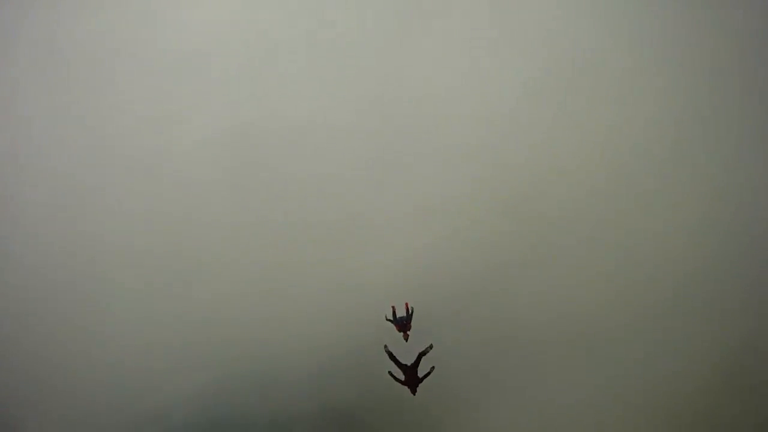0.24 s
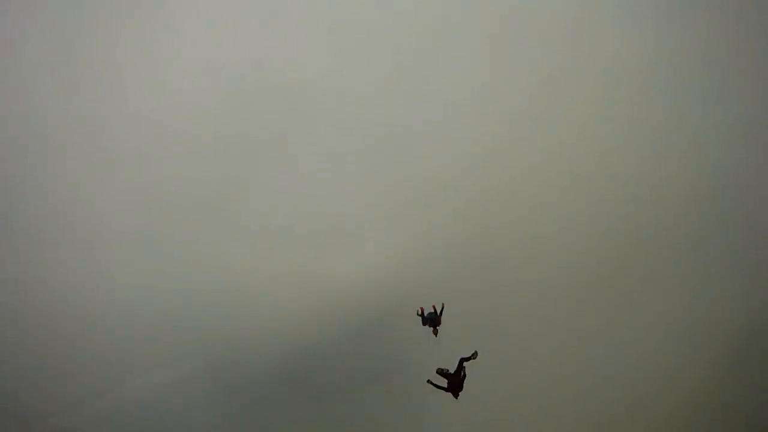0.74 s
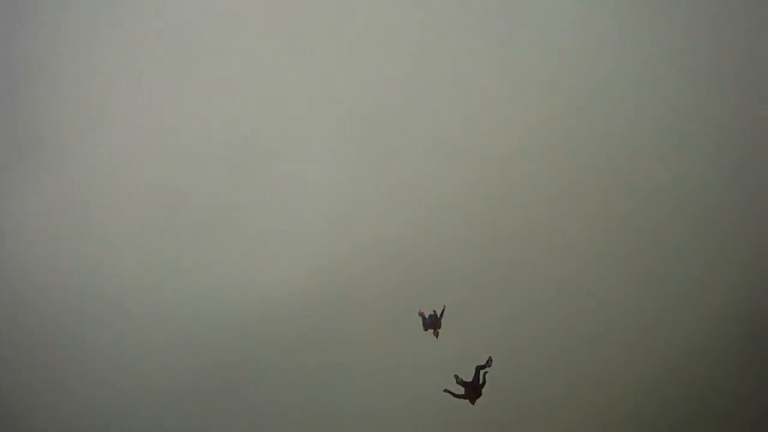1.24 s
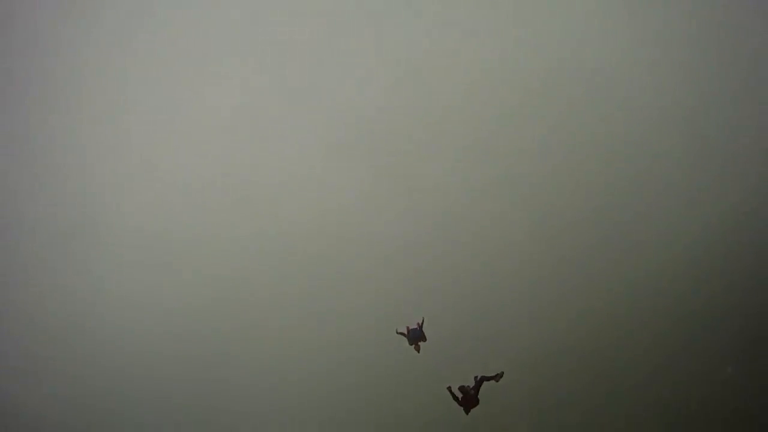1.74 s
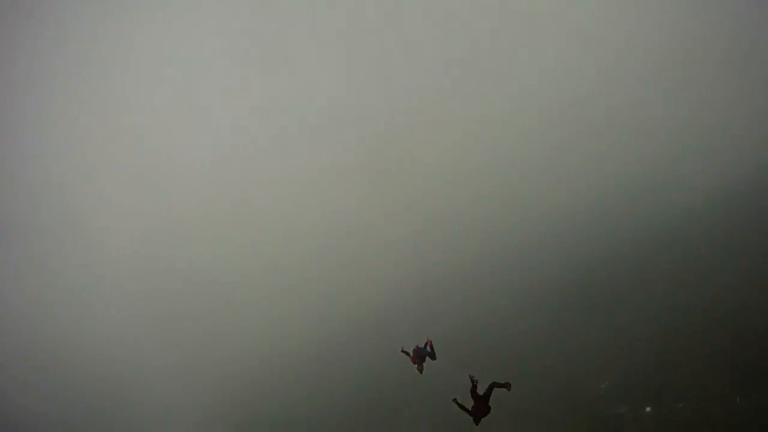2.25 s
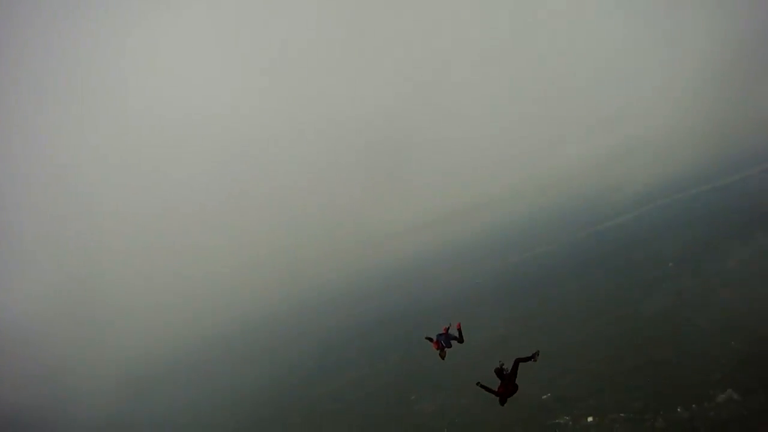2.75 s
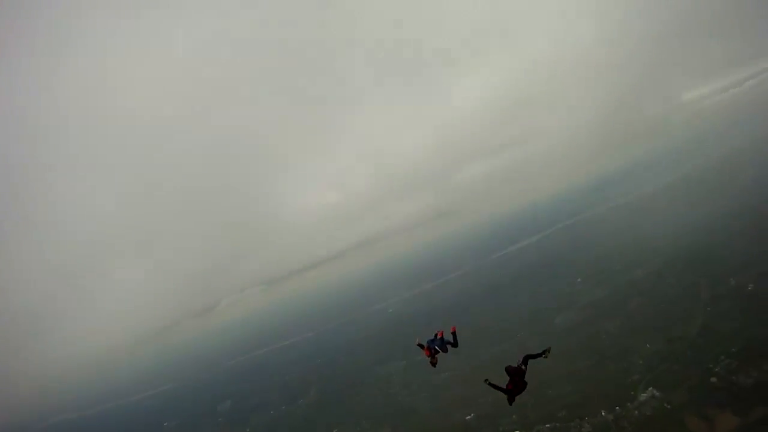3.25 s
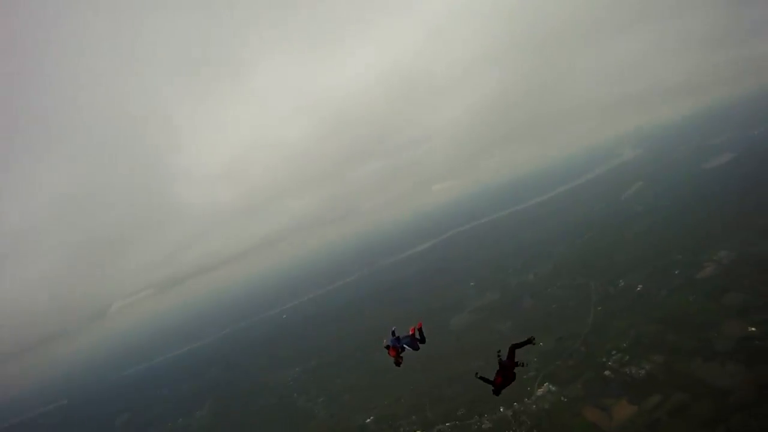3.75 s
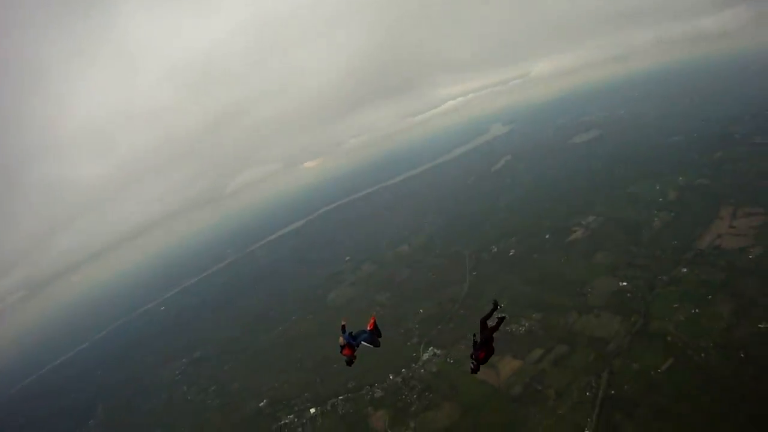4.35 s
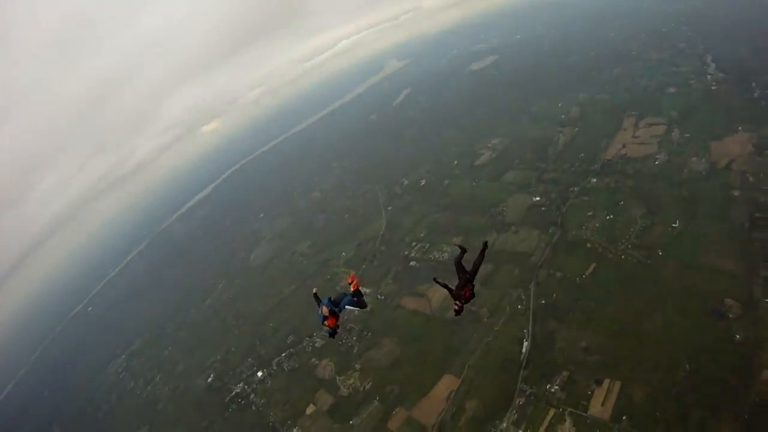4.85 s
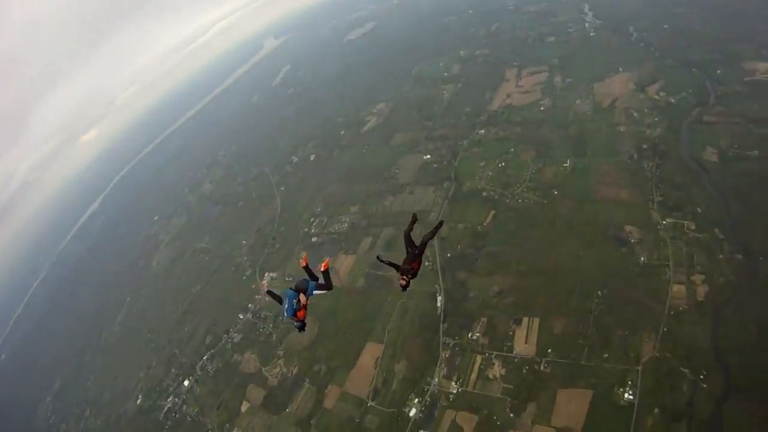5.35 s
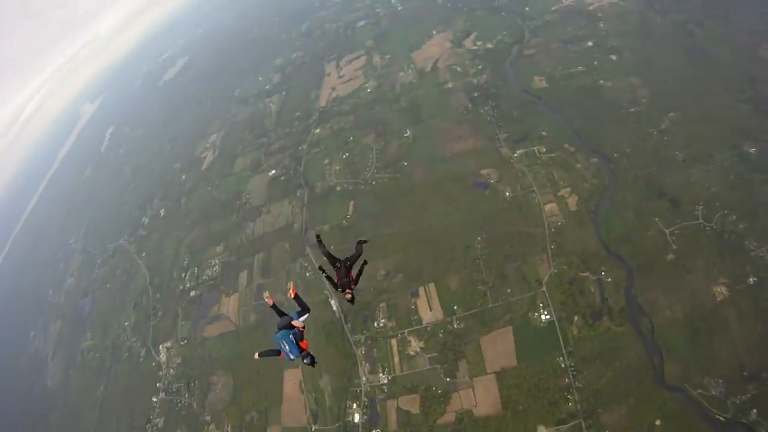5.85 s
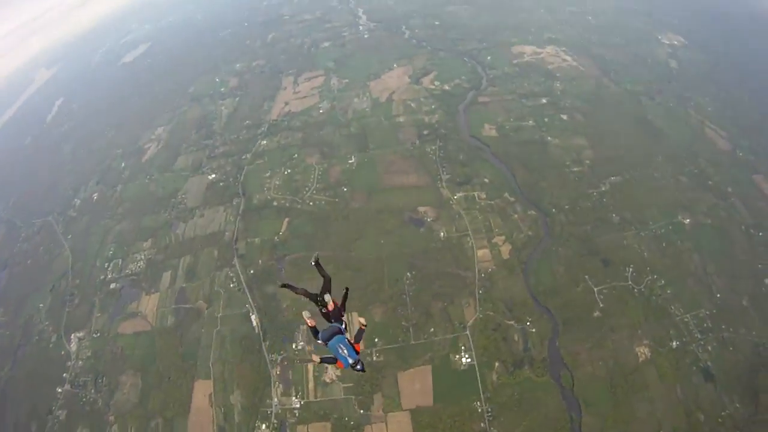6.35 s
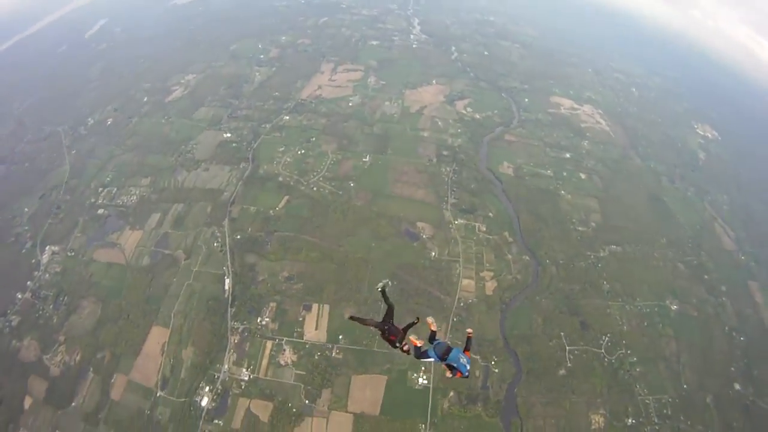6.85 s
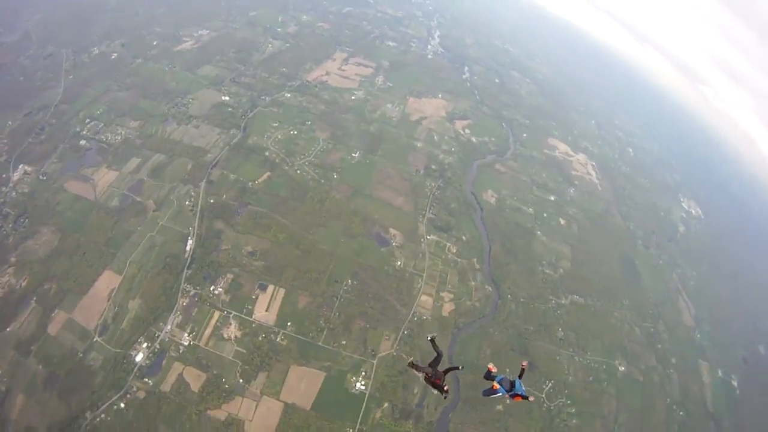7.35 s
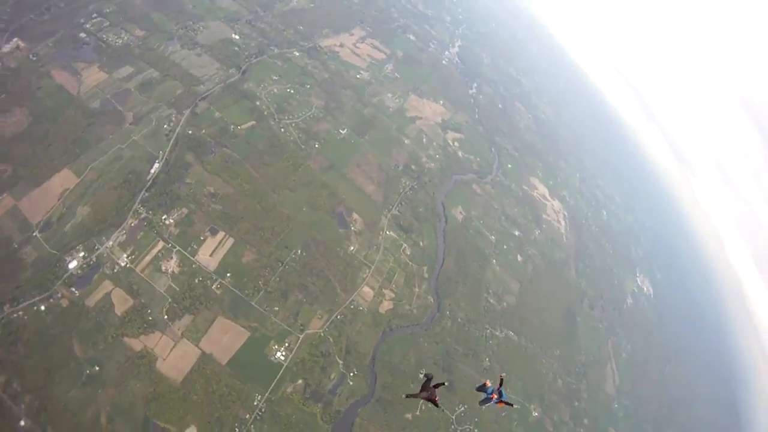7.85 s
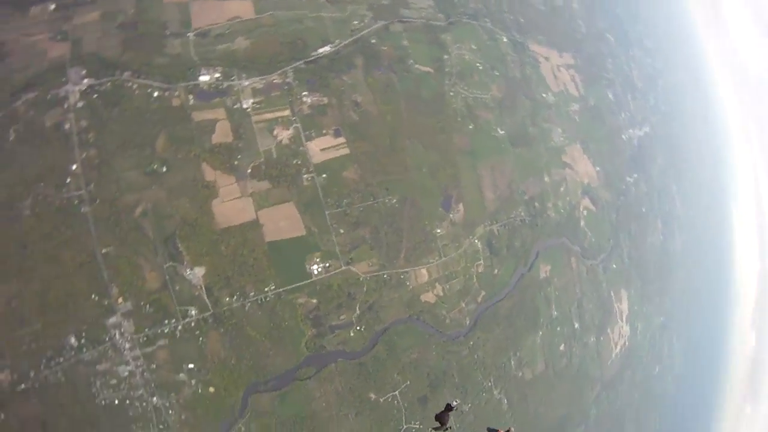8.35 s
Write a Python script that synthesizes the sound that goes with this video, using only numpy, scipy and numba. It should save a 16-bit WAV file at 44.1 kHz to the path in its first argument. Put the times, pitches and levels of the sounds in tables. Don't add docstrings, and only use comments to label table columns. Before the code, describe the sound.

A steady, loud freefall wind roar runs from start to finish, close on a helmet camera microphone in open sky. From 0 to 4 seconds it is hollow and midrange, ringing around two kilohertz, with faint low strap hums beneath, strongest near 0.3, 2.4 and 3.3-4. A flap dips in pitch around 1.2-1.8, and sharp little surges jolt at 1.7-1.8 and 3.5-3.7. Between 4 and 4.5 the head turns into the wind: the hiss broadens and deep buffeting swells, thumping at 4.4 and 5.25. A tiny high squeak flicks by at 4.75. Rough, breathy whistles blend in faintly from 6.7 to 8.4, with a hard surge near 7.6. Piercing short chirps cluster at 8.4-8.6 as the hiss brightens and another surge hits. The sound is compressed, gritty and metallic in the treble.

```python
import sys
import numpy as np
from scipy import signal
from scipy.fft import rfft, irfft
from scipy.io import wavfile
from scipy.ndimage import uniform_filter1d, map_coordinates
from numba import njit

SR = 44100
rng = np.random.default_rng(int(sys.argv[2]) if len(sys.argv) > 2 else 0)


def materialize(psi):
    bounded = np.clip(np.atleast_2d(psi).T, -1, 1)
    quanta = np.round(bounded * 32767).astype(np.int16)
    wavfile.write(sys.argv[1], SR, quanta)


def elevation(decibels):
    levels = np.asarray(decibels, float)
    return 10 ** (levels / 20)


N = 379260
SLOW_HZ, FAST_HZ = 12000, 48000

# [t/s, share/0-1]
HEAD_TURN = [
    (0, 0.03),
    (3.6, 0.06),
    (3.95, 0.2),
    (4.2, 0.79),
    (4.55, 1),
    (8.6, 0.85),
]
# [t/s, level/dB]
PRESSURE = [(0.0, -14.5), (1.75, -14.5), (1.87, -15.5), (3.02, -13.5), (3.66, -16.5), (3.97, -15),
            (4.0, -11), (4.02, -19), (4.33, -13.5), (5.2, -14.5), (6.06, -13), (6.63, -16), (6.75, -14.5),
            (8.21, -14), (8.31, -13), (8.38, -16.5), (8.46, -13.5), (8.6, -17.5)]
# [t/s, level/dB]
WAKE = [(0.0, -29.5), (1.63, -32), (1.84, -35), (2.3, -30), (2.94, -28.5), (3.02, -32.5), (3.04, -32.5),
        (3.62, -33.5), (4.33, -27), (4.69, -33.5), (5.15, -35), (5.82, -28.5), (7.11, -34.5), (7.35, -29),
        (7.64, -33.5), (8.29, -30.5), (8.46, -34), (8.6, -44)]
# [f/Hz, width/Hz, level/dB, f/Hz, width/Hz, level/dB]
ROAR_MODES = [(920, 167, -11.5, 874, 57, -7.5), (1084, 142, -3.5, 1117, 157, -8),
              (1458, 315, -4, 1500, 504, -3), (1830, 250, -7, 1050, 230, -6),
              (1908, 236, 1, 2003, 370, 0.5), (2202, 307, 0.5, 2262, 310, -1.5),
              (2602, 160, -12.5, 2560, 280, -4.5)]
# [f/Hz, width/Hz, level/dB, f/Hz, width/Hz, level/dB]
HISS_MODES = [(3150, 220, -5, 2890, 750, -7.5), (3536, 340, 0, 3300, 530, -3),
              (4010, 370, -16, 3755, 1000, -2.5), (4440, 660, -18, 3880, 300, -14.5),
              (4820, 490, -18, 4420, 370, -7), (5080, 610, -20.5, 4980, 580, -10),
              (5640, 830, -20.5, 5685, 1700, -10)]
# [f/Hz, width/Hz, level/dB, f/Hz, width/Hz, level/dB]
BODY_MODES = [(185, 180, -7.5, 183, 290, -2), (307, 160, 0, 230, 330, -1.5), (418, 58, -4, 410, 210, -2),
              (526, 86, 2, 545, 250, -3), (627, 54, 4.5, 625, 150, -5.5), (710, 230, -1.5, 730, 350, -4.5)]
# [f/Hz, width/Hz, level/dB, f/Hz, width/Hz, level/dB]
BUFFET_MODES = [(45, 50, -18, 58, 33, 4), (95, 39, -1.5, 109, 51, 12), (127, 74, -7.5, 114, 35, -4.5)]
# [t/s, half length/s, level/dB]
NODS = [
    (.25, .2, -3.5),
    (1.55, .2, 1.5),
    (3.75, .15, 3.5),
    (4.5, .2, 3),
    (5.0, .08, 2),
    (5.75, .25, 2),
    (6.3, 0.13, 2.5),
    (7.05, 0.083, -2),
    (7.55, .25, 3),
]
# [t/s, half length/s, level/dB]
DRAUGHTS = [(1.7, 0.063, 2), (2.0, 0.16, -1), (2.9, .15, 0), (3.5, .3, 2.1), (4.25, 0.33, -3.5),
            (4.72, 0.061, 0.5), (5.3, 0.085, 2.5), (5.65, 0.24, 2.5), (6.3, 0.17, 2), (6.72, 0.12, 3.5),
            (7.45, .1, 2.5), (8.58, 0.18, 7.5)]
# [t/s, half length/s, level/dB]
THUMPS = [(1.2, .08, 2), (1.35, .08, -4), (1.6, .15, 0), (1.85, .05, -5), (2.0, .1, 1.5), (4.1, 0.17, -1),
          (4.42, .18, 8.5), (4.73, .07, -7), (5.05, .1, -1), (5.25, 0.068, 7), (5.7, .12, 2),
          (6.1, 0.12, 4), (6.7, 0.22, 2.5), (6.97, 0.097, -4), (7.4, .2, 1.5), (7.9, 0.17, 0),
          (8.45, .12, 3)]
# [start t/s, length/s, settled f/Hz, level/dB]
STRAP_HUMS = [
    (0.0, .3, 90, -41),
    (0.221, 0.57, 86.3, -34),
    (0.752, .5, 84, -41),
    (1.401, 0.22, 108, -42),
    (2.329, 0.5, 84, -33.5),
    (3.238, 0.87, 83.5, -32.5),
]
# [start t/s, length/s, taut f/Hz, slack f/Hz, level/dB]
STRAP_FLAPS = [
    (1.17, .7, 330, 242, -37.5),
    (2.9, 0.86, 322, 315, -42.5),
    (3.845, .22, 317, 280, -35),
]
# [t/s, f/Hz, level/dB]
SQUEAK_PATH = [
    (4.69, 5120, -35),
    (4.715, 5080, -30),
    (4.735, 5010, -26),
    (4.762, 5070, -28),
    (4.775, 5200, -29),
    (4.81, 5270, -31),
    (4.83, 5280, -38),
]
# [start t/s, length/s, level/dB]
SLOT_WHISTLES = [
    (6.72, .3, -30),
    (7.05, .7, -34.5),
    (7.85, .55, -31),
]
# [start t/s, length/s, level/dB]
PIPE_WHISTLES = [
    (8.372, 0.032, -17),
    (8.416, .04, -26),
    (8.468, .055, -24),
    (8.512, 0.051, -12),
    (8.545, .1, -15),
]
# [peak t/s, surge level/dB, drop afterwards/dB]
SURGES = [
    (1.737, 10, -1),
    (1.81, 9, 1.5),
    (3.2, -6, 3),
    (3.519, 8.5, 2.5),
    (3.655, 6, 0.5),
    (4.0, -5, 1.5),
    (4.048, 4, 1),
    (5.08, -8, 3),
    (7.575, 13, -2.5),
    (8.538, 13, -0.5),
]


def unit(x):
    return x / np.sqrt(np.mean(x ** 2) + 1e-20)


def curves(rows, t):
    s, *columns = np.transpose(rows)
    return [np.interp(t, s, column) for column in columns]


def head_turn(t):
    return np.clip(curves(HEAD_TURN, t)[0], 0, 1)


def wobble(rate, t):
    return map_coordinates(rng.standard_normal(round(rate * N / SR) + 4), [t * rate + 1])


def bumps(rows, t):
    return sum(db * np.exp(-((t - s) / half) ** 2) for s, half, db in rows)


def ironed(x, share):
    power = uniform_filter1d(x ** 2, size=SR // 25)
    return unit(x / (power + .05) ** (share / 2))


def cavities(modes, drift_db, size, tilt_db=None, nods=()):
    nod_hz, nod_octaves = 1470, 0.23
    hz, t, z = signal.stft(rng.standard_normal(N), SR, nperseg=size)
    z[hz > SLOW_HZ / 2] = 0
    hz = hz[hz <= SLOW_HZ / 2, None]
    turn = head_turn(t)
    tilt = 0 if tilt_db is None else np.interp(t, np.arange(N) / SR, tilt_db)
    power = 0
    for sheltered, facing in np.reshape(modes, (-1, 2, 3)):
        centre, width, db = sheltered[:, None] * (1 - turn) + facing[:, None] * turn
        nod_db = bumps(nods, t) * np.exp(-(np.log2(centre / nod_hz) / nod_octaves) ** 2)
        own_db = drift_db * (wobble(2.62, t) + 0.84 * wobble(9, t))
        feed = elevation(db + nod_db + tilt * np.log2(centre) + own_db)
        power = power + (feed / (1 + (2 * (hz - centre) / width) ** 2)) ** 2
    z[:len(hz)] *= np.sqrt(power / power.mean(axis=0))
    return unit(signal.istft(z, SR, nperseg=size)[1][:N])


def wind():
    t = np.arange(N) / SR
    pressure, wake = (c - c.mean() for c in curves(PRESSURE, t) + curves(WAKE, t))
    turn = head_turn(t)

    def level(base_db, per_pressure, per_wake, turn_db):
        return base_db + per_pressure * pressure + per_wake * wake + turn_db * turn

    roar_tilt = -0.48 * wake + 0.7 * pressure
    body_tilt = -0.13 * wake + .3 * pressure
    swell_db = 0.45 * wobble(9, t)
    eddies_db = .5 * wobble(12, t) + 1.04 * wobble(45, t) + 0.29 * wobble(130, t)
    roar_db = 0.84 * eddies_db + swell_db
    hiss_db = 0.16 * eddies_db + 0.9 * swell_db + 0.4 * wobble(20, t)
    body_db = 0.52 * eddies_db + 1.03 * wobble(9, t)

    roar = unit(elevation(roar_db) * cavities(ROAR_MODES, drift_db=0.4, size=2048, tilt_db=roar_tilt, nods=NODS))
    hiss = unit(elevation(hiss_db) * cavities(HISS_MODES, drift_db=-0.5, size=2048))
    body = unit(elevation(body_db) * cavities(BODY_MODES, drift_db=-0.14, size=2048, tilt_db=body_tilt))
    buffet = ironed(cavities(BUFFET_MODES, drift_db=-0.2, size=4096), share=.5)

    sound = elevation(level(-14, 1.15, 0, -0.62)) * roar
    sound += elevation(level(-28.5, 0.86, 0.11, 8) + bumps(DRAUGHTS, t)) * hiss
    sound += elevation(level(-31.5, 0.24, 1.06, 1.25)) * body
    sound += elevation(level(-39, -0.5, 0.27, 9) + bumps(THUMPS, t)) * buffet
    return sound


def tone(rows, unsteady, rate, shake_db, fade):
    start, end = rows[0][0], rows[-1][0]
    t = np.arange(round(start * SR), min(N, round(end * SR))) / SR
    hz, db = curves(rows, t)
    gate = np.clip(np.minimum(t - t[0], end - t) / fade, 0, 1)
    phase = 2 * np.pi * np.cumsum(hz * (1 + unsteady * wobble(rate, t))) / SR
    strength = np.sqrt(2) * gate * elevation(db + shake_db * wobble(rate, t))
    return np.pad(strength * np.sin(phase), (max(0, round(t[0] * SR)), N))[:N]


def strap_hum():
    catch, settle_s, fades_db = 1.067, 0.14, 3
    sound = 0
    for s, length, hz, db in STRAP_HUMS:
        rows = [(s, catch * hz, db), (s + settle_s, hz, db), (s + length, hz * .97, db - fades_db)]
        sound = sound + tone(rows, unsteady=0.014, rate=9.0, shake_db=0.5, fade=.06)
    return sound


def strap_flap():
    sound = 0
    for s, length, taut, slack, db in STRAP_FLAPS:
        rows = [(s, taut, db), (s + length / 2, slack, db), (s + length, taut, db - 5)]
        sound = sound + tone(rows, unsteady=0.011, rate=24, shake_db=2.0, fade=0.04)
    return sound


def squeak():
    return elevation(1.5) * tone(SQUEAK_PATH, unsteady=0.011, rate=300, shake_db=4.0, fade=.012)


def swell(s, length, db, hz):
    peak_at, swell_db = .35, 6.5
    return [(s, hz, db - swell_db), (s + peak_at * length, hz, db), (s + length, hz, db - swell_db)]


def slot_whistle():
    return sum(tone(swell(*row, 878), unsteady=0.0692, rate=83, shake_db=4.0, fade=0.05)
               for row in SLOT_WHISTLES)


def pipe_whistle():
    return sum(tone(swell(*row, 3285), unsteady=0.032, rate=770, shake_db=3.0, fade=.008)
               for row in PIPE_WHISTLES)


def scene():
    strap = strap_hum() + strap_flap()
    whistles = squeak() + slot_whistle() + pipe_whistle()
    return (wind() + strap + whistles)[None]


def surges(rise=0.0037, recover=0.035):
    t, db = np.arange(N) / SR, np.zeros(N)
    for s, surge_db, duck_db in SURGES:
        before = surge_db * np.exp(-np.abs(t - s) / rise)
        after = -duck_db * np.exp(-np.abs(t - s) / recover)
        db += np.where(t < s, before, after)
    return uniform_filter1d(db, size=90)


@njit
def ride(x, top, attack, release):
    out, gain, want = x.copy(), 1.0, 1.0
    for i in range(len(x)):
        out[i] = gain * x[i]
        want = min(want + release * (1 - want), top / (abs(x[i]) + 1e-9))
        gain += attack * (want - gain)
    return out


def hold(x):
    slow = signal.resample_poly(x, SLOW_HZ // 300, SR // 300)
    held = np.repeat(slow, FAST_HZ // SLOW_HZ)
    return signal.resample_poly(held, SR // 300, FAST_HZ // 300)[:N]


def drop_masked(x, under_db=15.5, follow=.45, lo_hz=11200, hi_hz=12800):
    hz, t, z = signal.stft(x, SR, nperseg=2048)
    hiss = np.log(np.mean(np.abs(z[(hz > 6500) & (hz < 8000)]) ** 2, axis=0) + 1e-20)
    limit = np.exp(hiss.mean() + follow * (hiss - hiss.mean())) * elevation(-2 * under_db)
    band = (hz // (SR / 256)).astype(int)
    for b in np.unique(band[(hz > lo_hz) & (hz < hi_hz)]):
        z[band == b] *= np.mean(np.abs(z[band == b]) ** 2, axis=0) > limit
    return signal.istft(z, SR, nperseg=2048)[1][:N]


def top_cut(x):
    return signal.sosfilt(signal.butter(12, 15310, fs=SR, output="sos"), x)


def record(dry):
    attack, release = 1 / (.0016 * SR), 1 / (.035 * SR)
    ridden = elevation(1.5) * ride(elevation(-0.3 + surges()) * dry[0], 0.56, attack, release)
    rounded = ridden / (1 + np.abs(ridden / .9) ** 6) ** (1 / 6)
    hz = np.fft.rfftfreq(N, 1 / SR)
    soft = irfft(rfft(rounded) / (1 + (hz / 5850) ** 30), N)
    mix = drop_masked(hold(soft))[None]
    return top_cut(mix)


dry = scene()
out = record(dry)
materialize(out)
```